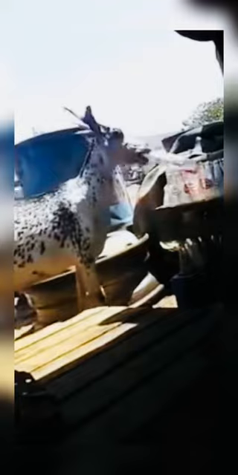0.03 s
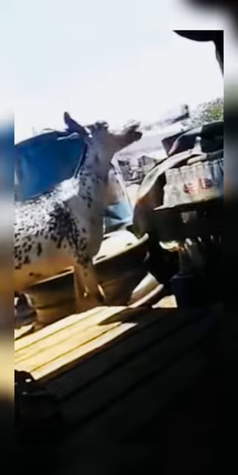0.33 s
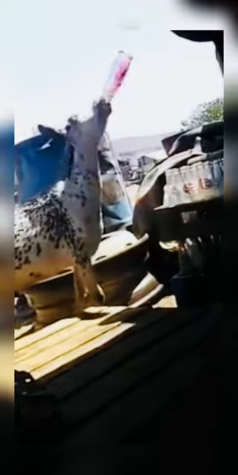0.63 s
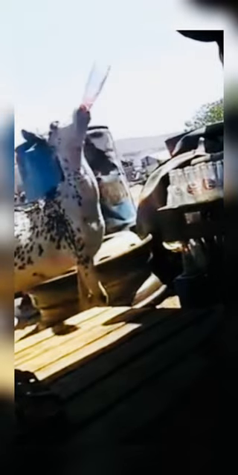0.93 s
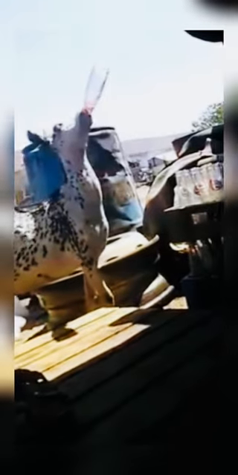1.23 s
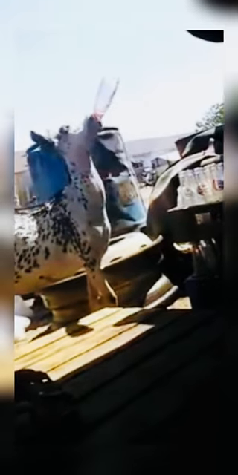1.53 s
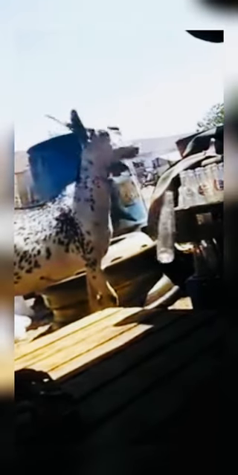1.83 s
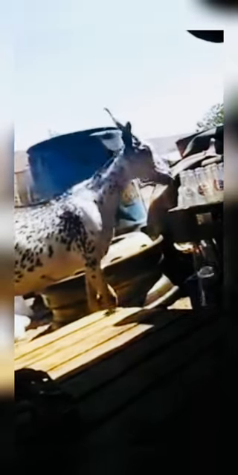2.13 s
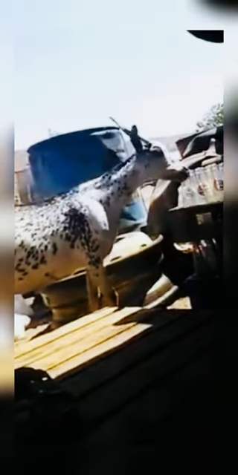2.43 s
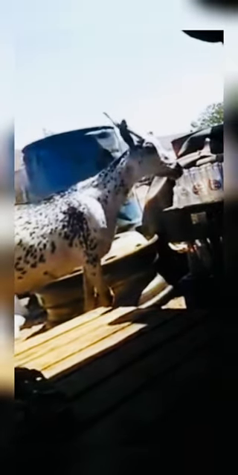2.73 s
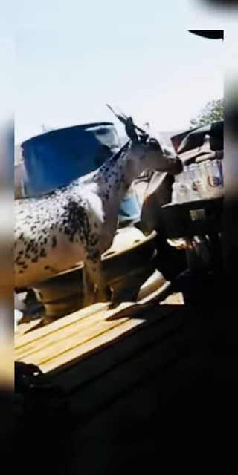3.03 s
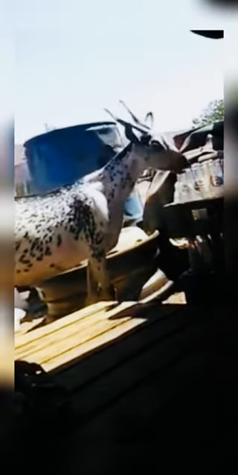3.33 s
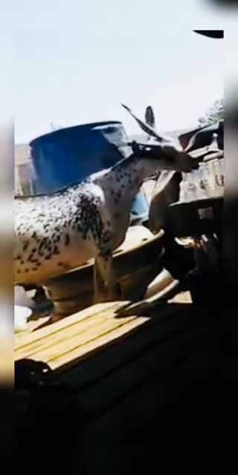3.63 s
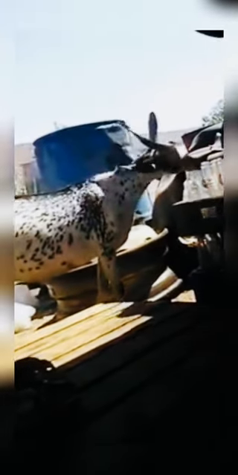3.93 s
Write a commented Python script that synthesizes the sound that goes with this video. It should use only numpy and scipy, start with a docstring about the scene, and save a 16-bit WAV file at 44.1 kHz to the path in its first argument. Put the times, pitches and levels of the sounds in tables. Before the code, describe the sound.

A glass bottle falls on hard ground outdoors. First, a gust of wind roars and buffets the microphone, dying away by about 1.5 seconds. At 2 seconds the bottle lands with a loud, hollow thud and a ringing clink, bounces with a clatter at 2.3 and clinks faintly at 2.6. Small knocks follow near 2.8 and 3.7 seconds. An engine idles with a low throb throughout.

```python
"""A glass bottle slips from a goat's mouth, thuds on hard ground, bounces and clinks twice more.
Hard impacts set the glass ringing, and the landing makes the enclosed air boom.
Before it, a gust of wind roars as turbulent noise and dies away. An engine idles throughout,
throbbing in harmonics of its firing cycle. A few small knocks come before and after the fall."""
import sys
import numpy as np
from scipy import signal
from scipy.fft import rfft, irfft, next_fast_len
from scipy.io import wavfile
from scipy.ndimage import map_coordinates

SR = 44100
rng = np.random.default_rng(int(sys.argv[2]) if len(sys.argv) > 2 else 0)


def put_to_file(sound):
    """Save the sound as 16-bit audio at rate SR, in the file named by the first command-line argument."""
    columns = np.atleast_2d(sound).T  # one column per channel
    safe = np.clip(columns, -1, 1)
    whole_steps = np.round(safe * 32767)
    wavfile.write(sys.argv[1], SR, whole_steps.astype(np.int16))


N = 176400
TIME = np.arange(N) / SR
AGE = np.arange(SR // 2) / SR  # t/s since an impact
DIP_S = 0.2  # the gust dips briefly and the treble opens


def amp(db):
    """Amplitude ratio of a level: a factor of ten per 20 dB."""
    return 10 ** (np.asarray(db) / 20)


def unit(x):
    """Normalisation to an rms of 1."""
    return x / np.sqrt(np.mean(x ** 2) + 1e-20)


def filtered(x, response):
    """Linear filtering: the spectrum is multiplied by a frequency response."""
    size = next_fast_len(len(x) + 8192)
    return irfft(rfft(x, size) * response(np.fft.rfftfreq(size, 1 / SR)), size)[:len(x)]


def noise(colour, size=N):
    """Spectral shaping: white noise takes on a colour (f/Hz, level/dB), at an rms of 1."""
    f, db = np.transpose(colour)
    response = lambda hz: amp(np.interp(np.log(hz + 1), np.log(f + 1), db))
    return unit(filtered(rng.standard_normal(size), response))


def wobble(rate):
    """Random modulation: a smooth curve through `rate` random values a second."""
    return map_coordinates(rng.standard_normal(int(N * rate / SR) + 4), [TIME * rate])


def fade(t60, attack=0.00034):
    """Exponential damping: after a quick rise the level falls 60 dB in t60 seconds."""
    return np.exp(-np.log(1000) * AGE / t60) * (1 - np.exp(-AGE / attack))


def ring(partials, damping=1, attack=0.0003, depth=0.28, flutter_hz=130):
    """Superposition: damped sinusoids add, each fluttering in amplitude and phase."""
    out = np.zeros(len(AGE))
    for hz, db, t60 in partials:
        in_phase, quadrature = (
            depth * map_coordinates(knots, [AGE * flutter_hz], mode="mirror")
            for knots in rng.standard_normal((2, 256)))
        phase = 2 * np.pi * hz * AGE
        tone = (1 + in_phase) * np.sin(phase) + quadrature * np.cos(phase)
        out += amp(db) * fade(t60 / damping, attack) * tone
    return out


def add(track, s, sound):
    """Superposition: a sound joins the track at s seconds."""
    part = track[max(0, round(s * SR)):][:len(sound)]
    part += sound[:len(part)]


def outdoor_air():
    """Ambient noise: a broad, slightly wavering band lies over a steady rumble."""
    # spectra of the air and its rumble: f/Hz, level/dB
    air_colour = [(100, -13), (170, 2), (227, -0.5), (298, -2.5), (400, -3.5), (563, -13.5), (680, -18),
                  (800, -7.5), (903, -11), (971, -12.5), (1400, -22.5), (1870, -27), (5150, -35.5),
                  (7500, -44.5), (9000, -44), (10300, -57), (12500, -47.5)]
    rumble_colour = [(25, -18.5), (42, 6.5), (76, 12), (130, 6.5), (220, -13.5), (400, -47)]
    air = amp(-52 + 0.18 * wobble(7.3) + 0.72 * wobble(54)) * noise(air_colour)
    return air + amp(-44.5) * noise(rumble_colour)


def engine(cycle_hz=12.16, hard_firing_s=3.0105):
    """Harmonic series: the orders align in phase once a cycle, where one cylinder fires harder."""
    # engine orders: multiple of the cycle rate, level/dB
    orders = [(4, -49), (5, -44), (6, -38.5), (7, -48.5), (8, -51), (9, -53), (10, -45), (12, -56.5),
              (13, -70.5), (15, -76.5), (17, -81), (19, -56.5)]
    cycles = (TIME - hard_firing_s) * cycle_hz + 0.0085 * wobble(8.1)
    throb = sum(amp(db + 0.47 * wobble(9.7)) * np.sin(2 * np.pi * k * cycles) for k, db in orders)
    return throb * amp(1.56 * wobble(16))


def wind_gust(crossover_hz=850, dip_db=-24.5, buffet_s=0.74, buffet_width_s=0.095):
    """Turbulence: a broadband roar swells, buffets the microphone, dulls and dies away."""
    # course of the gust: t/s, level/dB, top of the roar relative to its body/dB
    course = [(0.04, -36.5, 1), (0.1, -30.5, -0.5), (0.185, -27, -2.3), (0.24, -29, -1),
              (0.31, -28.5, -1.3), (0.38, -30.5, -3), (0.46, -28.5, -2), (0.62, -28.5, -3.5),
              (0.9, -33, -5.5), (1.15, -35, -7), (1.35, -45.5, -6), (1.6, -50.5, -9), (2.0, -51, -15)]
    # spectra of the roar and the buffeting: f/Hz, level/dB
    roar_colour = [(30, -30), (60, -6), (110, -4.5), (160, -2), (275, -10), (465, -2.5), (550, -8.5),
                   (640, -3.5), (800, -3), (1000, -9.5), (1200, -18.5), (1420, -28), (1900, -33),
                   (3000, -46), (6000, -62), (12000, -83)]
    buffet_colour = [(35, -28), (70, 0.5), (110, -8), (160, -5), (260, -24), (800, -100)]
    times, *columns = np.transpose(course)
    level_db, top_db = (np.interp(TIME, times, column) for column in columns)
    dip_fall = np.clip((TIME - DIP_S) / 0.0058 + 1, 0, 1)
    dip = dip_fall * np.exp(-np.maximum(TIME - DIP_S, 0) / 0.012)
    roar = noise(roar_colour)
    body = filtered(roar, lambda hz: 1 / (1 + (hz / crossover_hz) ** 4))
    top = roar - body
    wavering = body * amp(0.54 * wobble(39.36)) + top * amp(top_db + 1.2 * wobble(41))
    swell = np.exp(-((TIME - buffet_s) / buffet_width_s) ** 2)
    return amp(level_db + dip_db * dip) * wavering + amp(-37) * swell * noise(buffet_colour)


def small_knocks(half_width_octaves=0.35):
    """Damped resonance: broad noise bands give knocks and scuffs, one high mode two faint tinks."""
    # knocks and scuffs: t/s, level/dB, centre f/Hz, T60/s
    knocks = [(.044, -47.5, 1540, 0.19), (0.045, -51, 2980, 0.11), (0.689, -61.5, 3400, 0.32),
              (2.093, -36, 307, .06), (2.133, -38, 400, 0.033), (2.815, -52.5, 1000, 0.11),
              (2.846, -41.5, 624, 0.05), (3.447, -64, 2020, 0.21), (3.655, -44, 650, 0.1),
              (3.6824, -38.5, 1150, 0.06), (3.683, -53, 3200, 0.084)]
    # opening tinks: t/s, level/dB
    tinks = [(.037, -51), (0.0563, -45)]
    # their mode: f/Hz, level/dB, T60/s
    tink_modes = [(6000, -12, 0.13)]
    out = np.zeros(N)
    for s, db, centre_hz, t60 in knocks:
        peak = lambda hz: 1 / (1 + (np.log2((hz + 1) / centre_hz) / half_width_octaves) ** 2)
        band = lambda hz: peak(hz) / (1 + (hz / centre_hz / 2) ** 2)
        add(out, s, amp(db) * fade(t60) * unit(filtered(rng.standard_normal(len(AGE)), band)))
    for s, db in tinks:
        add(out, s, amp(db) * ring(tink_modes))
    return out


def ground_contacts():
    """Impact and friction: the bottle thumps, clatters, crunches grit and skids with a bright rasp."""
    # impacts: t/s, thump level/dB, thump f/Hz, clatter level/dB, grit level/dB
    contacts = [(2.0247, -15.5, 262, -22, -45.5), (2.032, -18, 232, -30.5, -52),
                (2.0366, -9, 247, -30, -39.5), (2.044, -23, 490, -37, -51),
                (2.3352, -39, 594, -29.5, -48.5), (2.3467, -17.5, 280, -21, -57),
                (2.3551, -22.5, 374, -25.5, -56), (2.362, -25, 312, -36, -59)]
    # skids on the bounce: t/s, level/dB, T60/s
    skids = [(2.336, -61, .08), (2.347, -55.5, 0.13), (2.558, -75, .14)]
    # spectra of the contact noises: f/Hz, level/dB
    clatter_colour = [(130, -34), (230, 1.5), (340, 2.5), (420, -6), (500, -0.5), (640, -5.5), (800, -4.5),
                      (980, -9.5), (1200, -19), (1450, -24), (1900, -20), (2300, -34), (3000, -34.5),
                      (6000, -89)]
    grit_colour = [(1000, 14), (2000, 7), (3500, 3.5), (6000, -2), (9500, -11), (12500, -11), (14000, -22)]
    skid_colour = [(5000, -24.5), (6100, 3), (6800, -10), (7500, 5), (8200, -7), (9100, 7), (10000, -3),
                   (11000, -12), (14000, -25)]
    out = np.zeros(N)
    for s, thump_db, hz, clatter_db, grit_db in contacts:
        add(out, s, amp(thump_db) * fade(t60=0.021, attack=0.001) * np.sin(2 * np.pi * hz * AGE))
        add(out, s, amp(clatter_db) * fade(t60=0.056) * noise(clatter_colour, len(AGE)))
        add(out, s, amp(grit_db) * fade(t60=0.12, attack=0.0019) * noise(grit_colour, len(AGE)))
    for s, db, t60 in skids:
        add(out, s, amp(db) * fade(t60, attack=0.001) * noise(skid_colour, len(AGE)))
    return out


def glass_clinks():
    """Free vibration: after a short crack the glass rings, damped where it stays on the ground."""
    # strikes: t/s, ring level/dB, twin level/dB, crack level/dB, damping factor, attack/s
    clinks = [(2.0372, -41, -48, -46, 1.15, .0004), (2.044, -42, -48, -46, 4, .0004),
              (2.338, -60, -64, -65, 2.2, .001), (2.3555, -59, -61, -72, 1.7, .001),
              (2.3785, -60.5, -59, -71, 1.8, .001), (2.558, -57.5, -59, -78, 1.5, .006)]
    # partials of the clink: a main ring at 4908 Hz, its two flutter side tones and fainter glass
    # tones; close twins beat against them: f/Hz, level/dB, T60/s at damping 1
    clink_partials = [(3359, -23, .15), (3919, -23, .15), (4398, -22, .15), (4665, -13, .17),
                      (4798, -14, .14), (4908, 0, .25), (5158, -16, .16), (5750, -22, .15),
                      (6230, -17, .27)]
    twin_partials = [(4966, 0, .19), (5010, -5, .17), (6335, -16, .14)]
    # spectrum of the crack: f/Hz, level/dB
    crack_colour = [(2500, -25), (4000, -11), (5000, 9), (6300, -5), (7200, -18), (12000, -23),
                    (16000, -10)]
    out = np.zeros(N)
    for s, ring_db, twin_db, crack_db, damping, attack in clinks:
        crack = amp(crack_db) * fade(t60=0.045) * noise(crack_colour, len(AGE))
        glass = amp(ring_db) * ring(clink_partials, damping, attack)
        twins = amp(twin_db) * ring(twin_partials, damping, attack)
        add(out, s, crack + glass + twins)
    return out


def bottle(boom_s=2.037, clank_s=2.348, low_cut_hz=180):
    """Impact excitation: amid thuds and clinks the cavity booms and something hollow clanks."""
    # modes of the enclosed air and of the thing hit on the bounce: f/Hz, level/dB, T60/s
    cavity_modes = [(240, -1.5, 0.35), (356, -4.5, 0.22), (492, -8, 0.216)]
    hollow_modes = [(1130, -6, 0.29), (1863, -18, 0.17)]
    out = ground_contacts() + glass_clinks()
    add(out, boom_s, amp(-33.5) * ring(cavity_modes))
    add(out, clank_s, amp(-37) * ring(hollow_modes))
    return signal.sosfilt(signal.butter(3, low_cut_hz, "high", fs=SR, output="sos"), out)


def yard(x):
    """Scattering: things standing around add a short diffuse tail."""
    tail = rng.standard_normal(len(AGE)) * fade(t60=0.16, attack=0.0039)
    return x + amp(-11) * signal.fftconvolve(x, tail / np.linalg.norm(tail))[:N]


def scene():
    """Superposition: bottle and knocks sound in the yard, over wind, air and engine."""
    return (yard(bottle() + small_knocks()) + wind_gust() + outdoor_air() + engine())[None]


def record(dry, start_s=0.035, edge_s=0.003, muffle_hz=6400, top_hz=13300):
    """Band limiting: the sound is muffled until the dip, then opens; both ends fade quickly."""
    below = lambda x, edge_hz: filtered(x, lambda hz: 1 / np.sqrt(1 + (hz / edge_hz) ** 120))
    x = dry[0] * np.clip(np.minimum(TIME - start_s, TIME[-1] - TIME) / edge_s, 0, 1)
    clear = np.clip((TIME - DIP_S) / 0.035, 0, 1)
    return below(clear * x + (1 - clear) * below(x, muffle_hz), top_hz)[None]


dry = scene()
out = record(dry)
put_to_file(out)
```